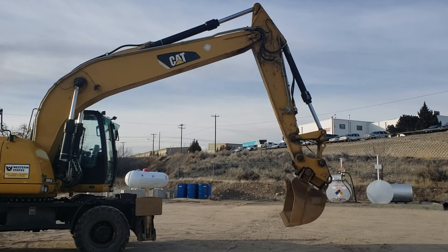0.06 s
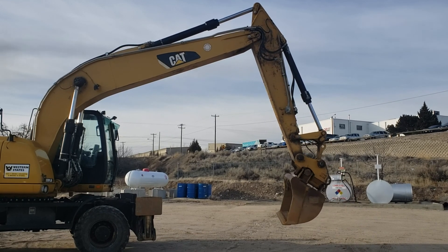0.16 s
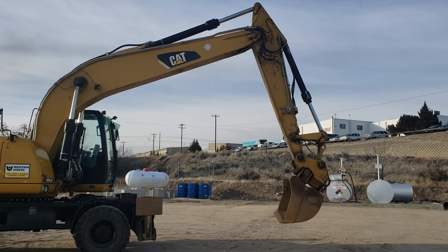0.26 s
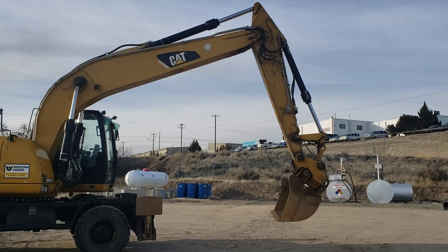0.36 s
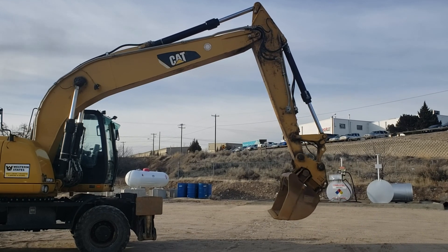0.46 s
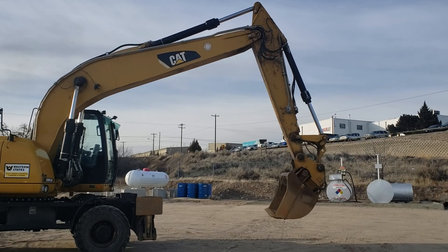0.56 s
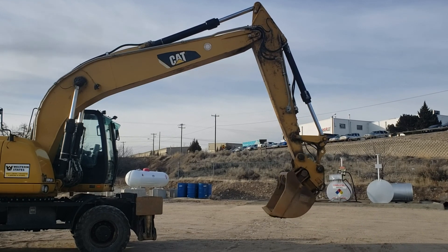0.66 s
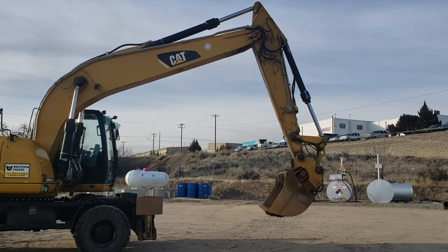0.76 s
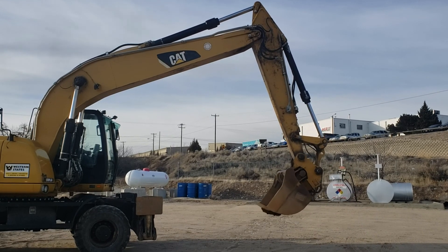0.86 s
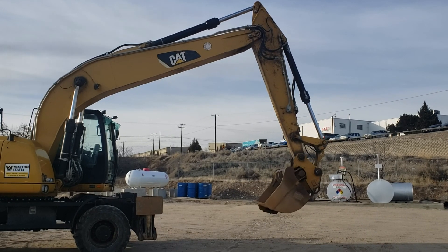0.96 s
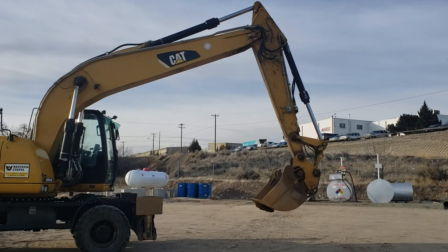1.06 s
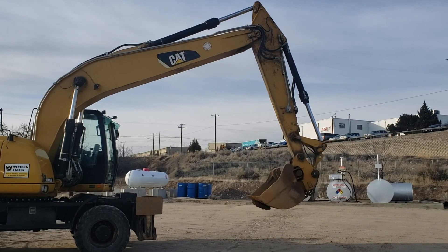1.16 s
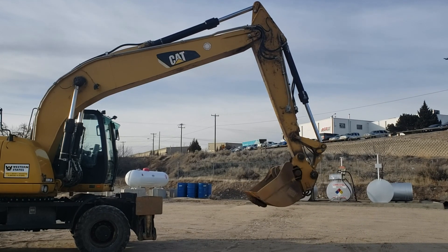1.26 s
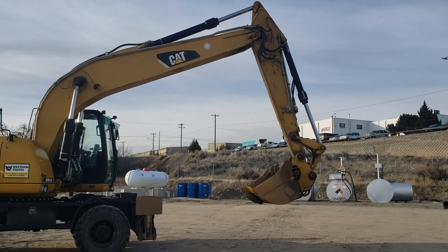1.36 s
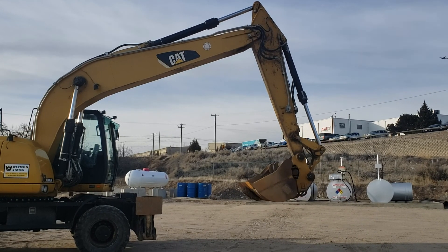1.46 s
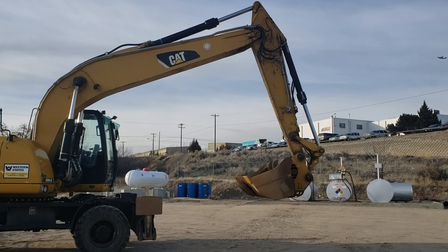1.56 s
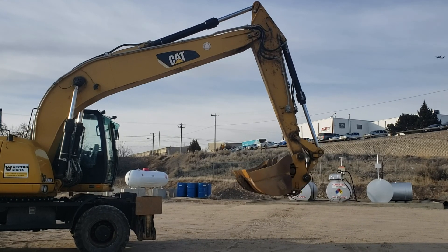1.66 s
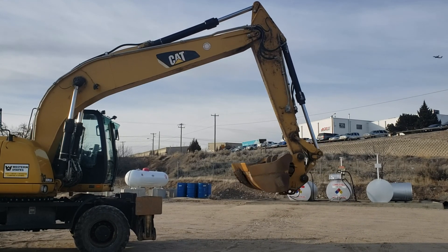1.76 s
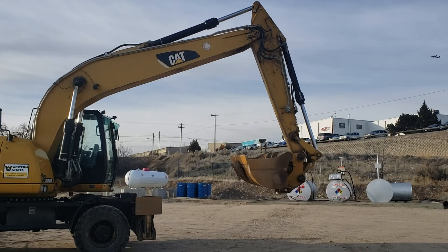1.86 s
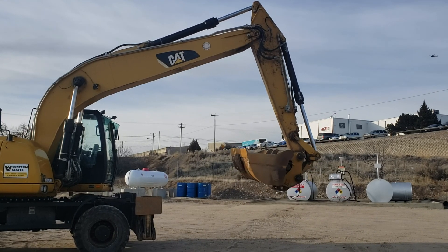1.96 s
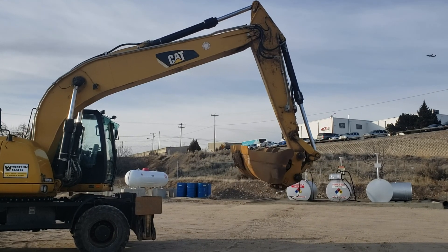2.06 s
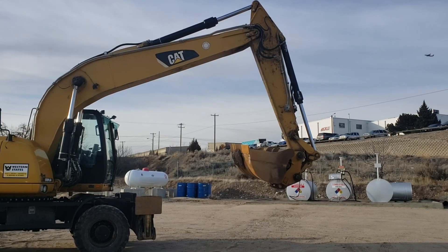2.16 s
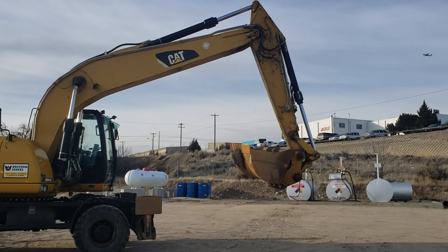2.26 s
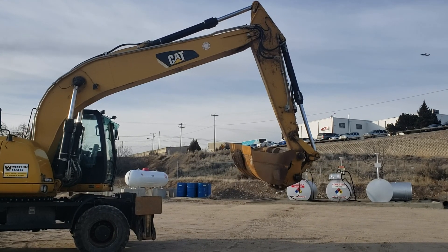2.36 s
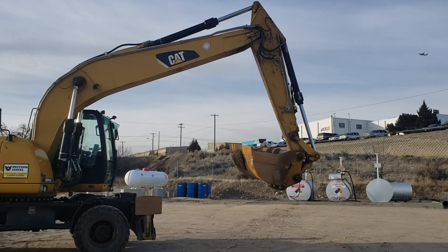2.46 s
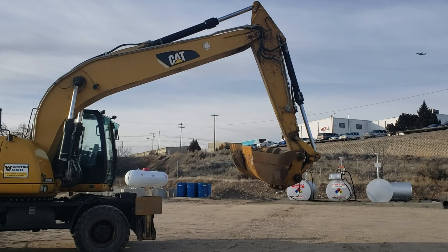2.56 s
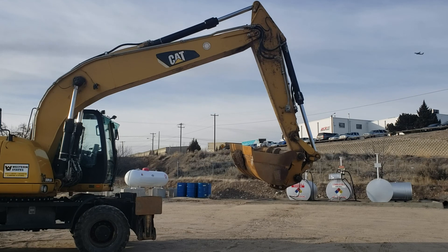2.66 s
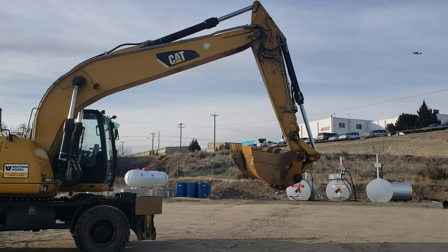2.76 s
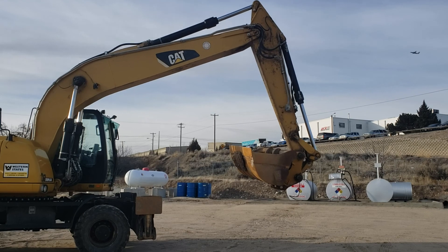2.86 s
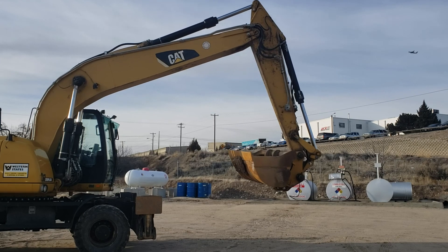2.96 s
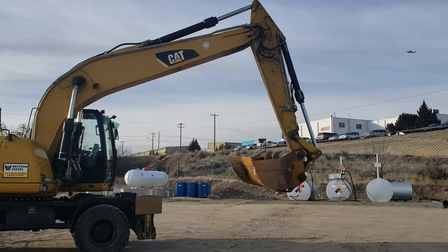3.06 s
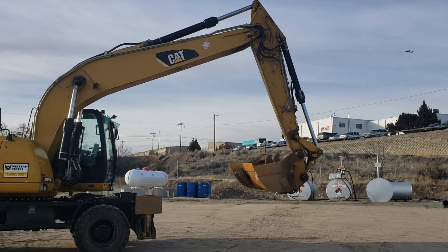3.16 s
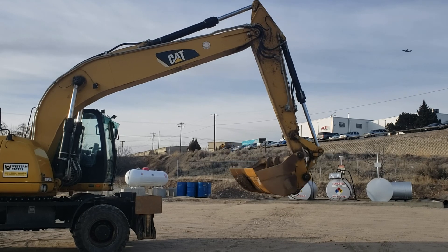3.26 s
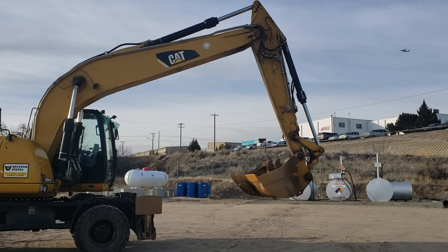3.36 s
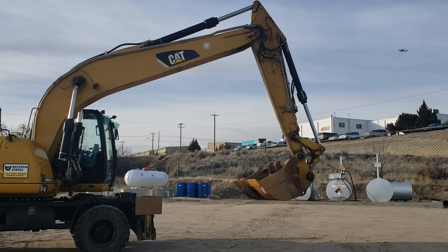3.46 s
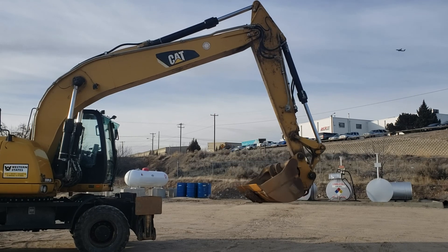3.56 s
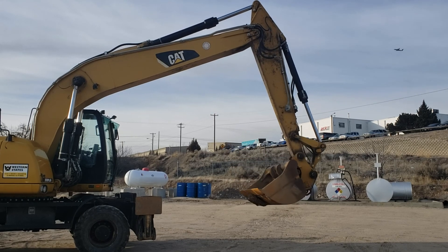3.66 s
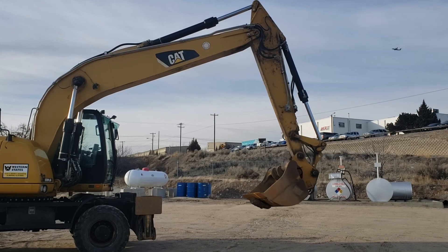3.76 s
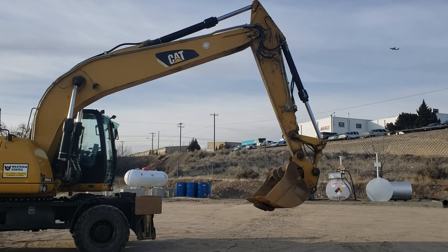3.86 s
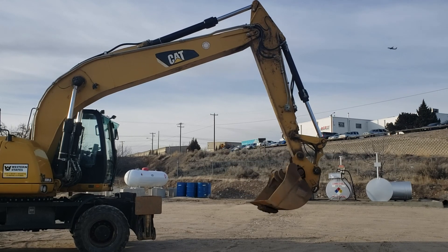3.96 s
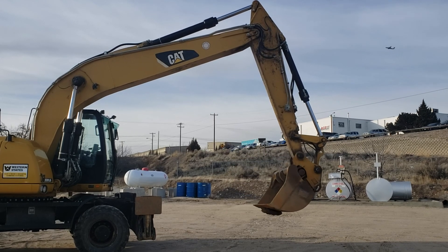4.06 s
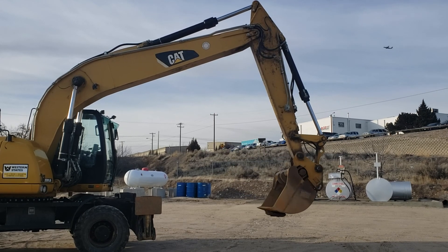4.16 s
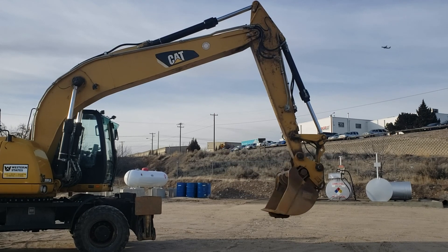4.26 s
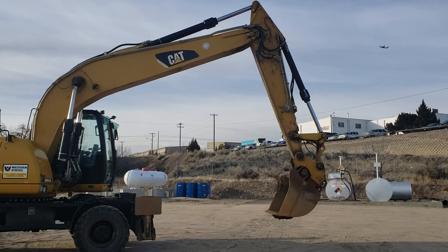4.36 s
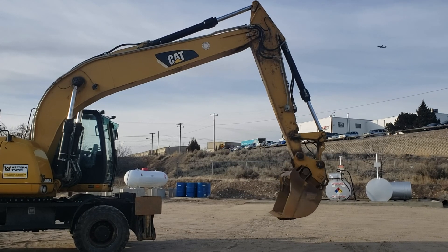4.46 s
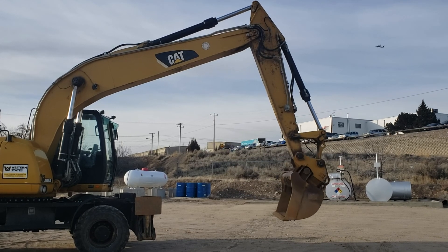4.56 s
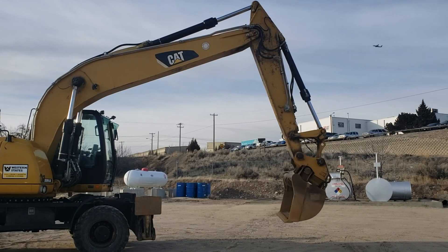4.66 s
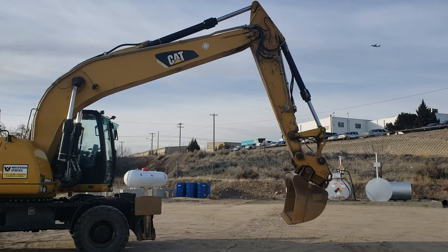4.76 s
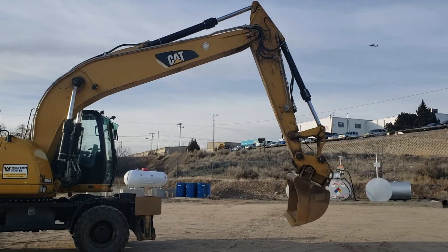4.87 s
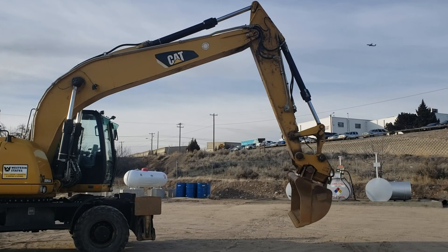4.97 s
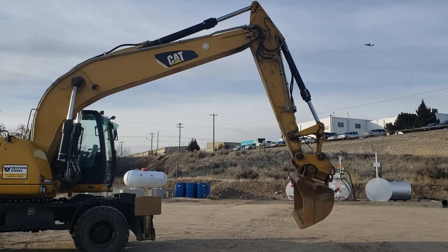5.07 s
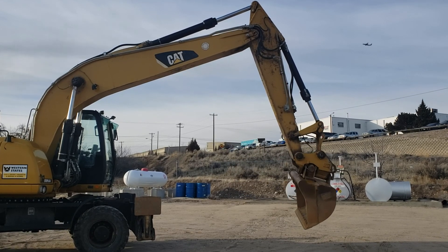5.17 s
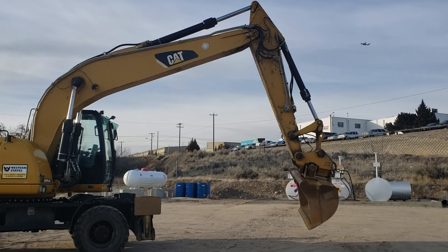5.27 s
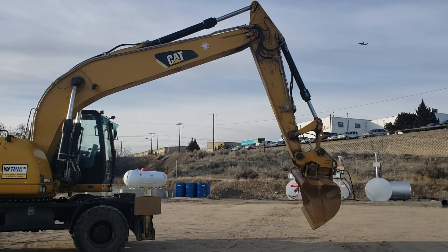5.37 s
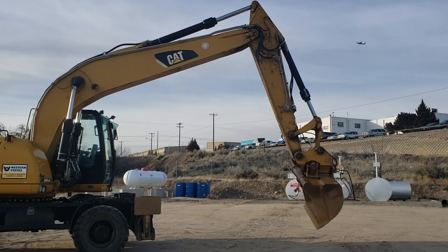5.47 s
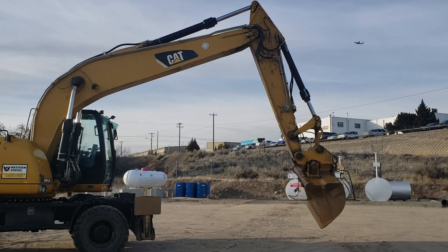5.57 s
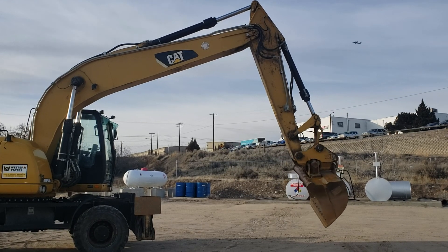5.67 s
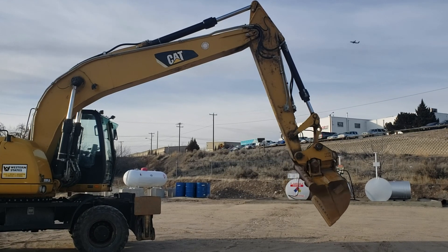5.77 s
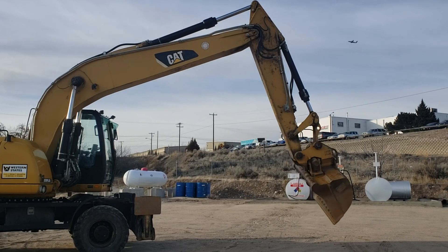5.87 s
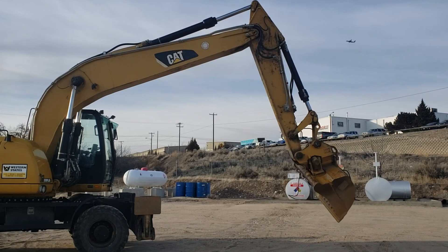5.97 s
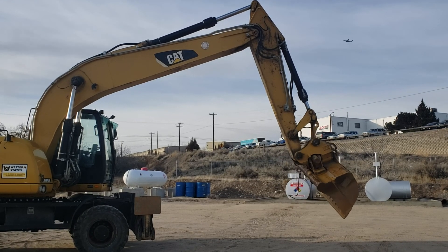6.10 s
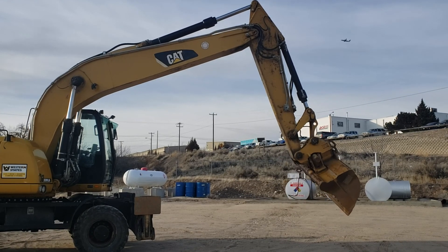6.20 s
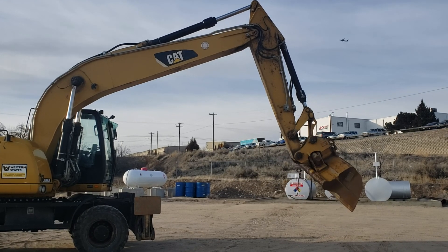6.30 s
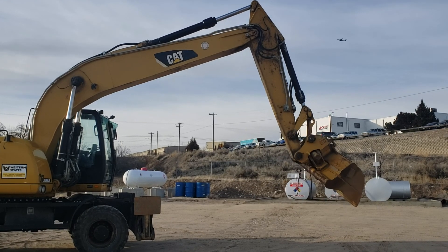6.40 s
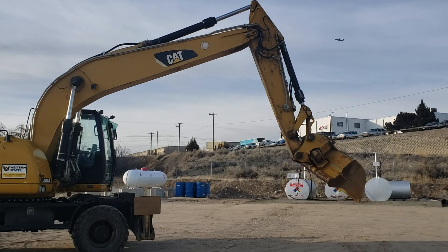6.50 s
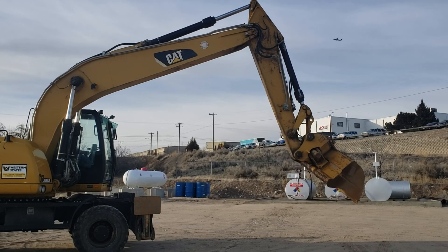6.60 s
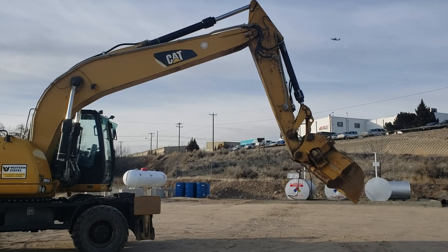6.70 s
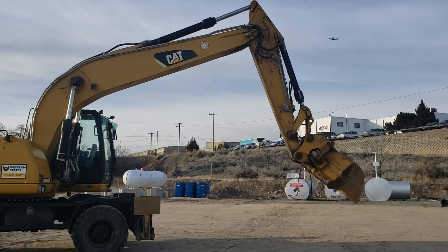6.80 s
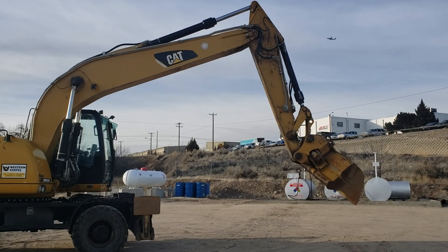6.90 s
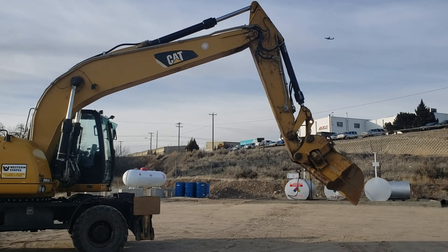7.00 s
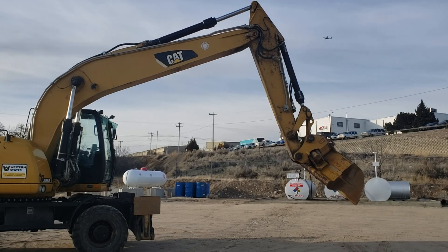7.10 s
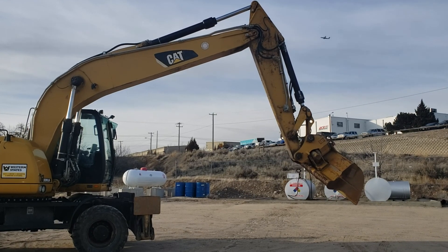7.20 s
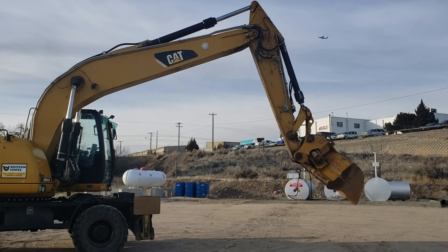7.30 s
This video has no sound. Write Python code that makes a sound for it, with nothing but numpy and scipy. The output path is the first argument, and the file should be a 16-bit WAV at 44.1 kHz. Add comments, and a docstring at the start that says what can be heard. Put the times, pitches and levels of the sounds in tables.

```python
"""Oil hisses through a ram over a diesel's drone: an excavator in an open yard curls its bucket in, rests, then
swings it out against the stop, where the steel clangs and rattles on its pins. Engine and pump share one shaft:
the pump whines under load, the fan and the pump sing off load, and the turbo spools down and up behind the
load. Far off a propeller plane passes. Heard from a spaced pair of microphones, engine to the left and arm to
the right, with a breeze touching both."""
import sys
import numpy as np
from scipy import signal
from scipy.fft import rfft, irfft
from scipy.io import wavfile
from scipy.ndimage import map_coordinates

SR = 44100
rng = np.random.default_rng(int(sys.argv[2]) if len(sys.argv) > 2 else 0)


def master(y):
    """Save y as 16-bit WAV."""
    cut = np.clip(np.atleast_2d(y).T, -1, 1)
    pcm = np.round(cut * 32767)  # scale
    wavfile.write(sys.argv[1], SR, pcm.astype(np.int16))


N = 323694
T = np.arange(N) / SR
F = np.fft.rfftfreq(N, 1 / SR)

# The pump's working strokes. Each row: start, end, attack and release in seconds, load from 0 to 1,
# then base levels in dB of the whine, the throb, the exhaust and the casing's roar.
STROKES = [(-1.0, 2.135, .8, 0.066, 0.74, -44.5, -60, -30.5, -82),
           (2, 2.85, 0.1, 0.14, 0, -47.5, -78, -46, -54), (3, 6.95, 1.12, 0.61, 1, -38, -44, -27.5, -49.5)]
# The turbo's rotor. Each row: time in seconds, blade tone in Hz, whistle level in dB.
TURBO = [(0, 7880, -60), (2.15, 7900, -59.5), (2.35, 7530, -61), (2.5, 7200, -69), (3, 6370, -60),
         (3.3, 5980, -58.5), (3.55, 5800, -57.5), (4.15, 6230, -57.5), (5, 7100, -66), (5.5, 7570, -62),
         (6.65, 7830, -62), (6.95, 7600, -72), (7.3, 7050, -78)]


def undb(db):
    """Decibels to gain."""
    return 10 ** (np.asarray(db) / 20)


def unit(x):
    """Scale to rms 1."""
    return x / np.sqrt(np.mean(x ** 2))


def noise():
    """White noise."""
    return rng.standard_normal(N)


def walk(rate):
    """A smooth random wander of rms 1, moving up to about rate times a second."""
    return unit(irfft(rfft(noise()) / (1 + (F / rate) ** 4), N))


def curves(table):
    """Each column after the first (seconds) as a signal in time."""
    times, *columns = np.transpose(table)
    return [np.interp(T, times, column) for column in columns]


def gate(start, end, attack, release):
    """Rise, hold and fall between start and end, all in seconds."""
    return np.clip((T - start) / attack, 0, 1) * np.clip((end - T) / release, 0, 1)


def swell(middle, length):
    """A smooth rise and fall, length seconds long."""
    return np.cos(np.pi * np.clip((T - middle) / length, -.5, .5))


def decay(start, t60):
    """Jump to 1 at start, then fall 60 dB every t60 seconds."""
    return (T >= start) * np.exp(-np.log(1000) * np.abs(T - start) / t60)


def lag(x, seconds):
    """Follow x with inertia."""
    keep = np.exp(-1 / (seconds * SR))
    return x[0] + signal.lfilter([1 - keep], [1, -keep], x - x[0])


def turn(hz):
    """Phase of something that turns at a changing rate."""
    return 2 * np.pi * np.cumsum(hz) / SR


def tone(phase, rough, rate):
    """A tone of rms 1 with a turbulent skirt reaching about rate Hz to each side."""
    return unit((1 + rough * walk(rate)) * np.sin(phase) + rough * walk(rate) * np.cos(phase))


def colour(x, spectrum):
    """Give x a spectrum of (Hz, dB) points that falls away beyond its ends; rms 1."""
    hz, db = np.transpose(spectrum)
    skirts = 1 / (1 + (F / hz[-1] / 2) ** 4) / (1 + (hz[0] / 2 / (F + 1)) ** 4)
    shape = undb(np.interp(np.log(F + 1), np.log(hz), db))
    return unit(irfft(rfft(x) * skirts * shape, N))


def resonate(x, resonances):
    """Lift or cut a few narrow bands (Hz, width Hz, dB); rms 1."""
    lift_db = sum(db / (1 + (2 * (F - hz) / width) ** 2) for hz, width, db in resonances)
    return unit(irfft(rfft(x) * undb(lift_db), N))


def burst(x, envelope):
    """Noise under an envelope, with just the envelope's energy."""
    return unit(x * envelope) * np.sqrt(np.mean(envelope ** 2))


def ram(start, end, spectrum, glide_per_s, whistle_s, width_hz, whistle_db, spread_db, flutter_db, count):
    """Oil hisses through the ram's ports; short whistles come and go, gliding as the piston travels."""
    t = np.arange(int(whistle_s * SR)) / SR
    window, whistles = np.hanning(len(t)), np.zeros(N + len(t))
    times, pitches = rng.uniform(start, end, count), rng.uniform(7500, 16000, count)
    gains = undb(spread_db * rng.standard_normal(count))
    for s, hz, gain in zip(times, pitches, gains):
        wander = np.cumsum(rng.standard_normal(len(t))) * np.sqrt(2 * np.pi * width_hz / SR)
        phase = turn(hz * np.exp(glide_per_s * t)) + wander
        i = int(s * SR)
        whistles[i:i + len(t)] += gain * window * np.sin(phase)
    whistles = unit(whistles[len(t) // 2:][:N]) * np.sqrt((end - start) / T[-1])
    hiss = colour(noise() + undb(whistle_db) * whistles, spectrum)
    return hiss / hiss[(T > start) & (T < end)].std() * undb(flutter_db * walk(35))


def valve_jet(hiss, middle_s=1.25, length_s=2.4, middle_hz=10600, glide_hz_per_s=4300, width_hz=1500):
    """The jet's rising resonance lifts one band of the hiss, most at the height of the curl."""
    hz = middle_hz + glide_hz_per_s * np.clip(T - middle_s, -length_s / 2, length_s / 2)
    carrier = np.exp(1j * turn(hz))
    lowpass = signal.butter(1, width_hz / 2, fs=SR, output="sos")
    band = 2 * np.real(signal.sosfilt(lowpass, hiss / carrier) * carrier)
    return hiss + undb(-4) * swell(middle_s, length_s) * band


def curl_in():
    """The bucket curls in: a loud, surging hiss with sinking whistles, ringing in the valve's ports."""
    # The oil flow. Each row: time in seconds, relative level in dB.
    flow = [(0.0, -28), (0.114, -36), (0.204, -32), (0.264, -25), (0.32, -35), (0.36, -29), (0.576, -32),
            (0.67, -26), (0.992, -30), (1.032, -26), (1.158, -31), (1.202, -25.5), (1.258, -29.5),
            (1.372, -27.5), (1.638, -36), (1.8, -53)]
    # The colour of the hiss. Each row: frequency in Hz, relative level in dB.
    spectrum = [(3820, -60), (6500, -17), (7440, -7.5), (8750, -2.5), (10500, 2.5), (11600, 0), (12300, -2),
                (13700, -2.5), (15100, 4), (16000, -5.5)]
    # The ports' resonances. Each row: centre in Hz, width in Hz, lift in dB.
    ports = [(8350, 200, 2), (8930, 300, 3.5), (9650, 250, 2.5), (10650, 400, 2.5), (13000, 300, 2.5)]
    end = flow[-1][0]
    hiss = ram(0, end, spectrum, glide_per_s=-.11, whistle_s=.42, width_hz=28,
               whistle_db=0, spread_db=1.8, flutter_db=.7, count=300)
    hiss = resonate(hiss, ports) * hiss.std()
    return valve_jet(hiss * gate(-1, end, .1, .04) * undb(curves(flow)[0] - 1))


def effort():
    """The pump's load on the engine, and the turbo's boost from 0 at its slowest to 1 at its fastest."""
    load = sum(share * gate(*timing) for *timing, share, _, _, _, _ in STROKES)
    rotor = curves(TURBO)[0]
    return load, (rotor - rotor.min()) / np.ptp(rotor)


def exhaust(firing, load, boost, idle_db=-49, boost_db=6.5):
    """Firings drone in the exhaust, louder with fuel and boost, more uneven off load."""
    # The drone's harmonics. Each row: multiple of the firing rate, relative level in dB.
    harmonics = [(1, 0), (2, -20), (4, -25), (5, -28)]
    # The drone dips briefly. Each row: middle and length in seconds, change in dB.
    dips = [(.07, .12, -14), (1.52, .11, -14), (1.67, .07, -10), (5.87, .06, -9)]
    gain = undb(idle_db)
    for start, end, *_, drone_db, _ in STROKES:
        fuel = gate(start, end + .62, attack=.62, release=.95)  # the governor opens fast, shuts slowly
        gain = gain + fuel * undb(drone_db + boost_db * (boost - 1))
    waver_db = .8 * walk(18) + sum(db * swell(s, length) for s, length, db in dips)
    uneven = .13 + .4 * (1 - load) ** 2
    drone = sum(undb(db) * tone(k * firing, rough=uneven * np.sqrt(k), rate=14.3) for k, db in harmonics)
    return drone * gain * undb(waver_db)


def pump(firing, firing_hz, lug_hz=72.67, lug_db_per_hz=2):
    """The pump's pistons whine and throb on the engine's shaft, louder when it is dragged below lug_hz."""
    # The whine's overtones. Each row: multiple of the firing rate, relative level in dB.
    overtones = [(4.33, -15), (6, 0), (9, -11.5), (10, -21), (11.6, -15), (24, -27)]
    lug = undb(lug_db_per_hz * np.maximum(lug_hz - firing_hz, 0))
    whine_gain, throb_gain = 0, 0
    for *timing, _, whine_db, throb_db, _, _ in STROKES:
        work = gate(*timing)
        whine_gain += work * lug * undb(whine_db)
        throb_gain += work ** 2 * lug ** 1.92 * undb(throb_db)
    whine = sum(undb(db) * tone(k * firing, rough=.009 * k, rate=15) for k, db in overtones)
    throb = tone(3 * firing, rough=.15, rate=10)
    return whine * whine_gain + throb * throb_gain


def fan_and_pump(firing, load, full_load_db=-49):
    """The fan and the pump turn with the engine and sing clearest off load."""
    # Their tones: the fan's at 7.4, the pump's ninth order at 9. Each row: multiple of the firing rate, level
    # off load in dB.
    tones = [(7.4, -57), (9, -52.5)]
    song = sum(undb(db) * tone(k * firing, rough=.35, rate=14) for k, db in tones)
    return song * undb(full_load_db * lag(load, .2))


def gears(firing, order=12):
    """The gears whine at a multiple of the firing rate."""
    # The whine's course. Each row: time in seconds, level in dB.
    levels = [(0.4, -46.5), (2.04, -49), (2.08, -46.5), (2.55, -49), (3.1, -48), (3.7, -57), (6.4, -55),
              (7, -43)]
    return tone(order * firing, rough=.35, rate=18) * undb(curves(levels)[0])


def idle_tone(hz=826, level_db=-49.5):
    """A steady, rough tone while the load is off."""
    rest = gate(1.9, 3.5, attack=.2, release=.27)
    return tone(2 * np.pi * hz * T, rough=.9, rate=18) * rest * undb(level_db)


def casing_roar(firing, idle_db=-42):
    """Each firing shakes the casing, so its roar pulses in time."""
    # The roar's colour. Each row: frequency in Hz, relative level in dB.
    spectrum = [(76, -12), (130, -8.5), (183, -9.5), (220, -1), (245, -5.5), (395, -9), (430, -3.5),
                (497, -7.5), (659, -5), (753, -7), (820, -5.5), (1150, -18), (1570, -19.5), (2400, -19),
                (3120, -53), (5280, -120)]
    gain = undb(idle_db) + sum(gate(*timing) * undb(db) for *timing, _, _, _, _, db in STROKES)
    knock = 1 + .046 * np.cos(firing) + .12 * walk(66)
    return colour(noise(), spectrum) * knock * gain * undb(.62 * walk(12))


def rush(firing, load, idle_db=-52, load_lift_db=8):
    """Air and oil rush as the load builds, ringing in the engine's covers."""
    # The colour of the rush. Each row: frequency in Hz, relative level in dB.
    spectrum = [(880, 0.5), (1500, 6), (1760, 7), (2040, -1), (3920, -2.5), (5500, -4.5), (6310, -2.5),
                (7320, -11.5), (8080, -16.5), (9000, -9), (14300, -9.5), (16000, -10)]
    # The covers' ringing. Each row: centre in Hz, width in Hz, lift or cut in dB.
    covers = [(1766, 36, -4), (2780, 200, 5.5), (3433, 51, 5), (3946, 52, 7), (4640, 230, 5)]
    level_db = idle_db + load_lift_db * lag(np.sqrt(load), .29) + .5 * walk(22)
    air = resonate(colour(noise(), spectrum), covers)
    flutter = 1 + .018 * np.cos(firing) + .21 * walk(28)
    return air * flutter * undb(level_db)


def engine(load, boost):
    """The engine bay, left of the microphones: one slightly wavering shaft keeps its parts in step."""
    # The engine's speed. Each row: time in seconds, firing rate in Hz.
    speed = [(0.1, 72.4), (1.4, 71.7), (2.04, 72), (2.07, 75), (2.15, 78.3), (2.33, 78.4), (2.6, 76.7),
             (3.25, 72.6), (3.6, 70.7), (4.3, 71.65), (5.1, 70.27), (5.5, 72.8), (5.8, 72.74), (6.1, 71.96),
             (6.5, 71.83), (6.7, 77.5), (7.3, 74.7)]
    firing_hz = curves(speed)[0]
    firing = turn(firing_hz * (1 + .002034 * walk(15.2)))
    working_tones = exhaust(firing, load, boost) + pump(firing, firing_hz)
    light_tones = fan_and_pump(firing, load) + gears(firing) + idle_tone()
    return (place(working_tones, lag_ms=.25, pan_db=.3, scatter_db=-14)
            + place(light_tones, lag_ms=.24, pan_db=2, scatter_db=-11)
            + place(casing_roar(firing), lag_ms=.22, pan_db=2, scatter_db=-5)
            + place(rush(firing, load), lag_ms=.25, pan_db=.7, scatter_db=1))


def turbo(boost, blades=7, intake_hz=865, intake_width_hz=50):
    """The rotor's blades whistle over the tone of its shaft, which sweeps the intake's resonance."""
    blade_hz, whistle_db = curves(TURBO)
    phase = turn(blade_hz)
    whistle = tone(phase, rough=.36, rate=59) * undb(whistle_db)
    intake_db = 7 / (1 + (2 * (blade_hz / blades - intake_hz) / intake_width_hz) ** 2)
    shaft_db = -49.5 + intake_db - 9 * boost ** 2
    return whistle + tone(phase / blades, rough=.4, rate=15) * undb(shaft_db)


def breeze(base_db=-41):
    """Low turbulence in puffs: part reaches both microphones alike, part buffets each on its own."""
    # Gusts at the microphones. Each row: middle and length in seconds, strength in dB.
    gusts = [(1.58, 2.5, -50.5), (1.767, 0.1, -36), (2.907, 0.032, -28), (3.27, 0.2, -47),
             (5.09, 1.545, -46)]
    # The rumble's colour. Each row: frequency in Hz, relative level in dB.
    spectrum = [(18, -26), (35, -13.5), (52, -0.5), (72, -5.5), (110, -3.5), (160, -12.5), (260, -17),
                (600, -31.5)]
    strength = undb(base_db) + sum(swell(s, length) * undb(db) for s, length, db in gusts)
    strength *= undb(1.3 * walk(28))
    own = np.array([colour(noise(), spectrum) for _ in range(2)])
    return strength * (colour(noise(), spectrum) + undb(1.5) * own)


def squeaks(chatter_db=3):
    """Stick and slip in linkage and valve: short squeaks that chatter."""
    # Each row: middle and length in seconds, pitch in Hz, glide in Hz per second, width in Hz,
    # roughness, level in dB.
    slips = [(0.02, 0.1, 708, 13, 36, .45, -33.5), (0.18, 0.13, 1330, -300, 50, .8, -40),
             (0.235, 0.77, 1159, -400, 530, 2, -44), (0.411, 0.085, 576, 3.5, 44, .4, -31.5),
             (0.53, 0.56, 2190, -400, 300, 2, -48), (3.29, 0.12, 10200, 5003, 90, .7, -58),
             (5.183, 0.24, 10160, 598, 408, 2, -44)]
    out = np.zeros(N)
    for s, length, hz, glide, width, rough, db in slips:
        out += tone(turn(hz + glide * (T - s)), rough, rate=width / 2) * swell(s, length) * undb(db)
    return out * undb(chatter_db * walk(24))


def bucket(clang_t60=.24, crack_t60=.057, thud_t60=.21, rise_s=.0019, spread_db=3):
    """Each blow cracks at the contact, thuds in the arm, and rings the bucket's modes and plates."""
    # The bucket shifts on its pins, meets its stop and rebounds.
    # Each row: start in seconds, then the strengths of ring, thud and crack in dB.
    blows = [(1.665, -45, -35, -49), (6.508, -38, -40, -15.5), (6.52, -11.5, -13, -8.5),
             (6.532, -13, -18, -12), (6.5392, -3, -23.5, -36), (6.564, -27, -22, -42),
             (6.604, -9.5, -20.5, -18.5), (6.614, -9.5, -21, -36), (6.641, -19, -26, -28),
             (6.660, -14.5, -17, -34), (6.694, -22, -24, -52), (6.826, -25, -33, -50),
             (6.838, -23, -33, -44), (6.905, -16, -20.5, -41), (6.952, -20.5, -23, -47),
             (7.029, -49, -32.5, -48)]
    # The bucket's main modes. Each row: frequency in Hz, relative level in dB, t60 in seconds.
    resonances = [(186.5, -17.5, 1), (255.3, -20.5, 1), (281.7, -15.5, 0.93), (322.7, -15, 0.18),
                  (495, -10.5, 0.52), (590, 8.5, 0.051), (585, -17, 0.45), (618, -9, 0.2),
                  (677, -14.5, 0.32), (782, -6, 0.075), (786, -19.5, 0.24), (940, -13, 0.16),
                  (1013, -17, 0.18), (1395, -25, .14)]
    # The colours of plates, contact and arm. Each row: frequency in Hz, relative level in dB.
    plates = [(120, -2.5), (180, -13), (290, 0), (400, -15), (590, 3), (800, -5), (1100, -15.5),
              (1500, -20), (2200, -50), (5000, -67)]
    contact = [(300, 5.5), (800, 10), (1500, 1.5), (2200, 4.5), (3000, 3), (4200, 3), (6000, -5),
               (9000, -20.5), (16000, -27)]
    arm = [(130, -17), (200, -7), (260, 1.5), (320, 4), (400, -16), (480, -1), (700, -25)]
    t, out = T[:SR], np.zeros(N + SR)
    fade = lambda t60: decay(0, t60)[:SR] * (1 - np.exp(-t / rise_s))
    clang_noise, crack_noise, thud_noise = (colour(noise(), part) for part in (plates, contact, arm))
    modes = np.array([undb(db) * fade(t60) * np.sin(2 * np.pi * hz * t) for hz, db, t60 in resonances])
    for s, ring_db, thud_db, crack_db in blows:
        i, k = int(s * SR), rng.integers(N - SR)
        ring = undb(spread_db * rng.uniform(-1, 1, len(modes))) @ modes  # each lands on another spot
        clang = burst(clang_noise[k:k + SR], fade(clang_t60))
        thud = burst(thud_noise[k:k + SR], fade(thud_t60))
        crack = burst(crack_noise[k:k + SR], fade(crack_t60))
        body = undb(-6) * ring + undb(-8.5) * clang
        out[i:i + SR] += undb(ring_db) * body + undb(thud_db) * thud + undb(crack_db) * crack
    return out[:N]


def swing_out(start=3.62, end=6.56, flow_db=-43.5):
    """The bucket swings out: a softer hiss of oil with rising chirps."""
    # The colour of the hiss. Each row: frequency in Hz, relative level in dB.
    spectrum = [(6000, 6), (8000, -2), (9000, 0.5), (9600, -2.5), (10600, 3.5), (12500, -1.5), (15500, 10),
                (16500, -32.5)]
    # The oil flow surges. Each row: middle and length in seconds, lift in dB.
    surges = [(4.657, 0.91, 3)]
    hiss = ram(start, end, spectrum, glide_per_s=.33, whistle_s=.13, width_hz=130,
               whistle_db=1.5, spread_db=3.5, flutter_db=.8, count=950)
    surge_db = sum(db * swell(s, length) for s, length, db in surges)
    return hiss * gate(start, end, attack=.95, release=.07) * undb(flow_db + surge_db)


def plane(blade_hz=103.9, doppler=.065, pass_s=4.8, fall_s=1.19, level_db=-35.5):
    """A far propeller swells and sinks in pitch as it passes."""
    hz = blade_hz * (1 - doppler * np.tanh((T - pass_s) / fall_s))
    return tone(turn(hz), rough=.17, rate=42) * swell(middle=6.06, length=4.2) * undb(level_db)


def pin_rattle(start=6.55, end=6.7, clacks_per_s=110, first_db=-28.5, fall_db_per_s=45, spread_db=3):
    """The loose pins chatter after the bucket meets its stop: quick, uneven clacks that die away."""
    # The colour of a clack. Each row: frequency in Hz, relative level in dB.
    spectrum = [(900, -7), (1400, 8), (2100, -5), (2800, -7), (5000, -35)]
    count = int((end - start) * clacks_per_s)
    late, size = rng.uniform(-1.1, 1, (count, 2)).T
    times = start + (np.arange(count) + late / 2) / clacks_per_s
    levels_db = first_db - fall_db_per_s * (times - start) + spread_db * size
    clacks = sum(undb(db) * decay(s, t60=.03) for s, db in zip(times, levels_db))
    return colour(noise(), spectrum) * clacks


def linkage_ticks():
    """Steel snaps against steel in the linkage: brief, bright clicks."""
    # Each row: start in seconds, level in dB.
    snaps = [(6.591, -30), (6.656, -33)]
    bright = colour(noise(), [(4000, -12), (6500, -14), (11000, 14), (16000, 1)])
    return bright * sum(undb(db) * decay(s, t60=.024) for s, db in snaps)


def place(x, lag_ms, pan_db, scatter_db, t60=.22, drift_ms=.126):
    """Two spaced microphones, positive lag and pan to the left; ground and bank scatter x into both."""
    out, spectrum = [], rfft(x)
    for side in (1, -1):
        heard = spectrum * undb(side * pan_db / 2)
        delay = np.exp(1j * np.pi * side * F * lag_ms / 1000)
        echoes = noise() * decay(0, t60)
        scatter = irfft(heard * rfft(echoes / np.linalg.norm(echoes)) * F / (F + 700), N)
        # moving air keeps changing the length of the scattered paths
        drift = drift_ms * walk(4) * SR / 1000
        scatter = map_coordinates(scatter, [np.arange(N) + drift], order=3, mode="nearest")
        out.append(irfft(heard * delay, N) + undb(scatter_db) * scatter)
    return np.array(out)


def scene():
    """From the microphones, the engine stands to the left and the arm reaches to the right."""
    # The balance of the curling hiss. Each row: frequency in Hz, left minus right in dB.
    curl_balance = [(2380, 0.5), (4400, 5), (8120, -0.5), (15000, -8.5)]
    curl_pan_db = np.interp(F, *np.transpose(curl_balance))
    load, boost = effort()
    return (engine(load, boost) + breeze()
            + place(turbo(boost), lag_ms=.252, pan_db=3.5, scatter_db=-16)
            + place(plane(), lag_ms=-.1, pan_db=-5, scatter_db=-14)
            + place(curl_in(), lag_ms=-.099, pan_db=curl_pan_db, scatter_db=-3, t60=.025)
            + place(swing_out(), lag_ms=-.092, pan_db=-1.5, scatter_db=1.5, t60=.088)
            + place(squeaks(), lag_ms=-.095, pan_db=.5, scatter_db=-16)
            + place(bucket() + pin_rattle() + linkage_ticks(),
                    lag_ms=-.13, pan_db=1, scatter_db=-13, t60=.45))


def record(dry, top_hz=15950):
    """Full scale clips the highest peaks, and a steep filter cuts the top."""
    lowpass = signal.ellip(10, .2, 80, top_hz, fs=SR, output="sos")
    return signal.sosfilt(lowpass, np.clip(dry, -1, 1))


dry = scene()
out = record(dry)
master(out)
```